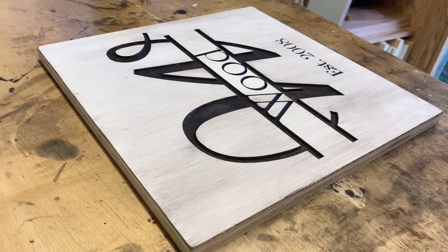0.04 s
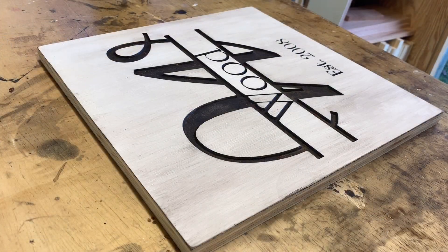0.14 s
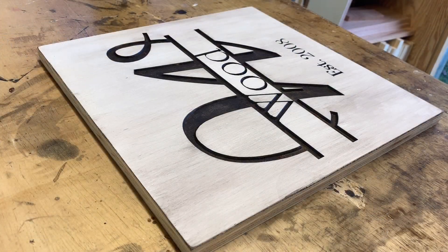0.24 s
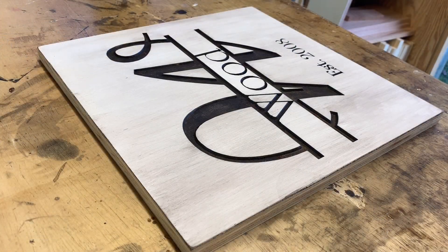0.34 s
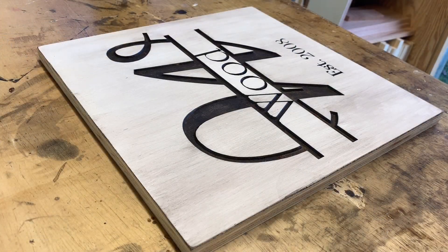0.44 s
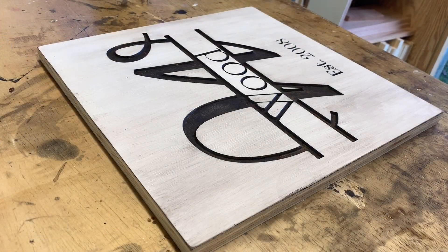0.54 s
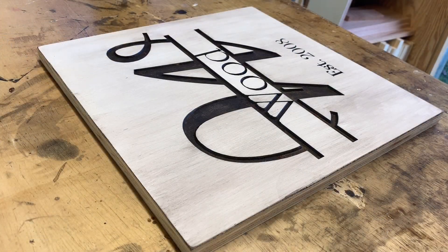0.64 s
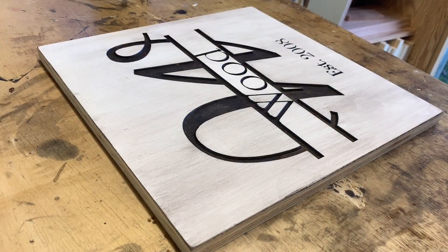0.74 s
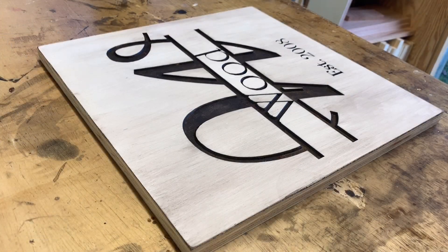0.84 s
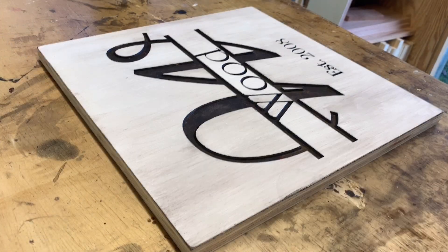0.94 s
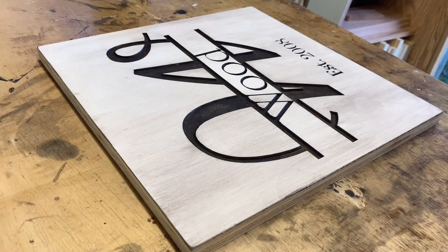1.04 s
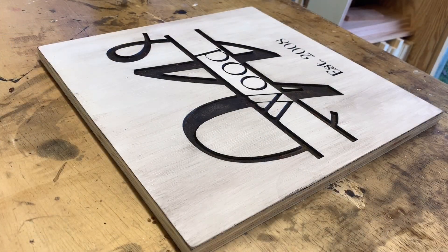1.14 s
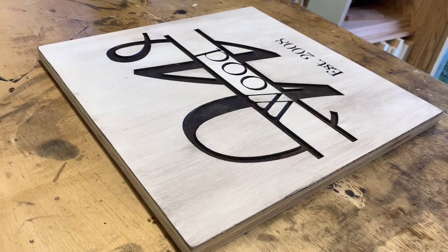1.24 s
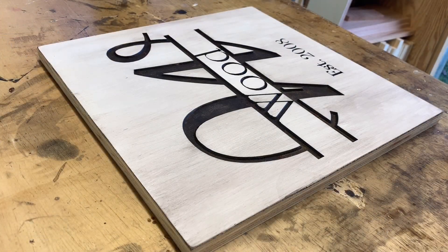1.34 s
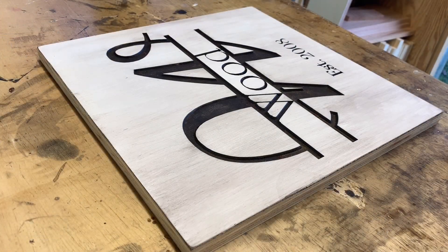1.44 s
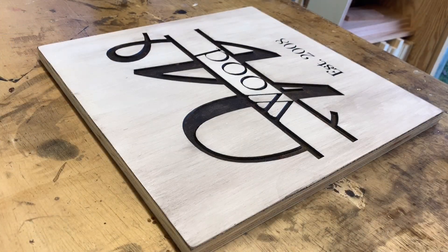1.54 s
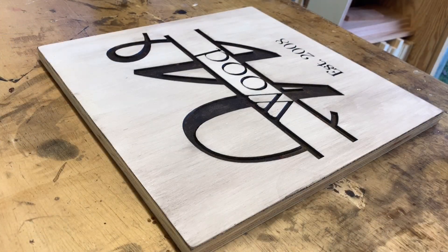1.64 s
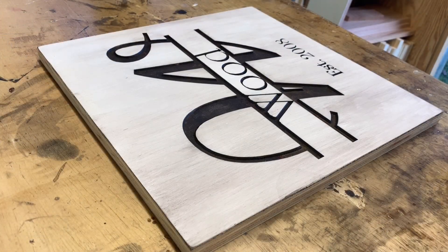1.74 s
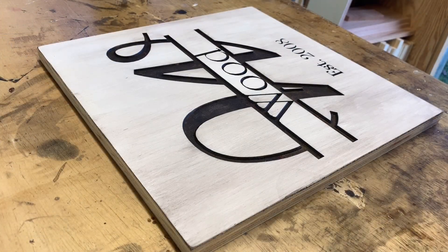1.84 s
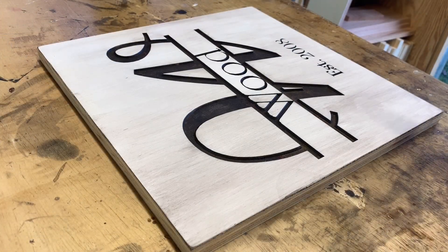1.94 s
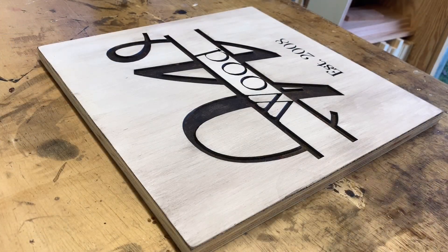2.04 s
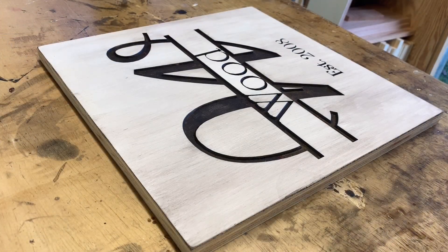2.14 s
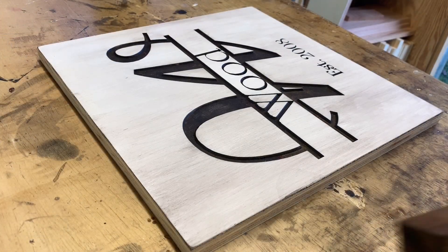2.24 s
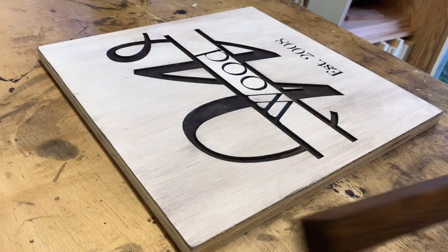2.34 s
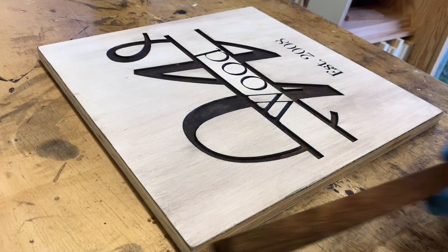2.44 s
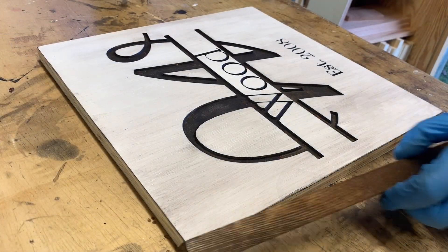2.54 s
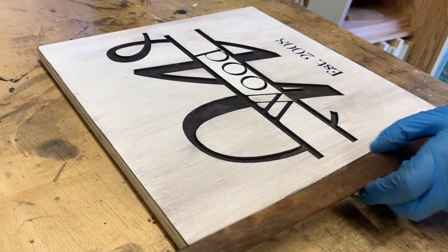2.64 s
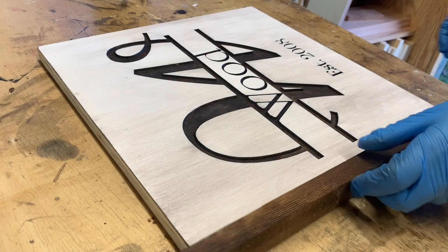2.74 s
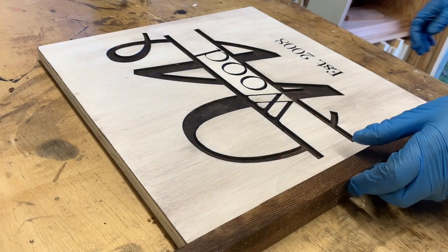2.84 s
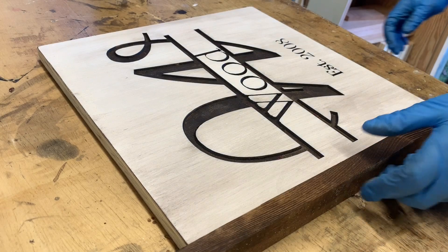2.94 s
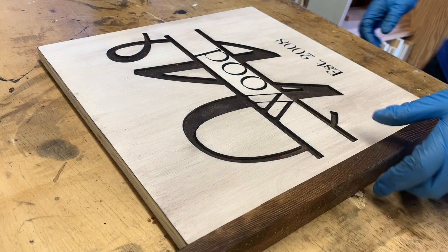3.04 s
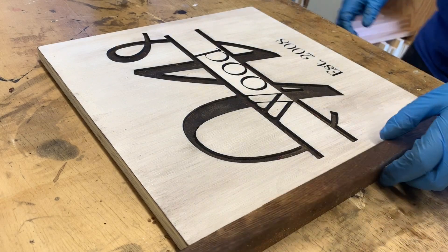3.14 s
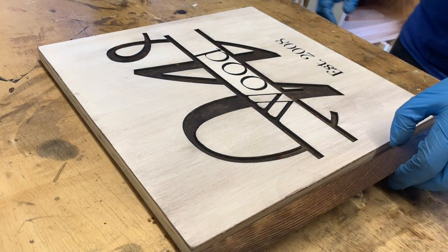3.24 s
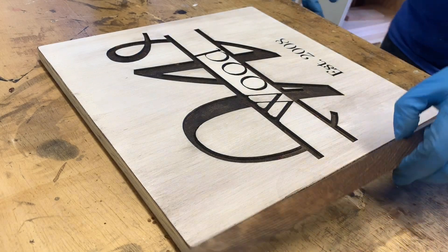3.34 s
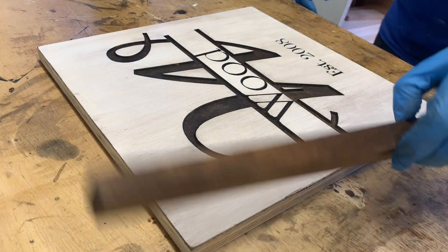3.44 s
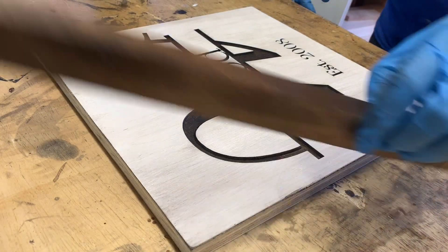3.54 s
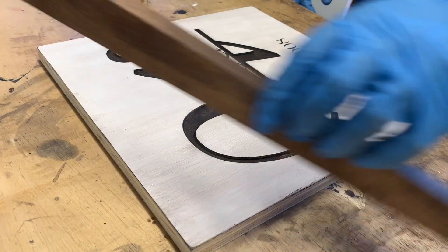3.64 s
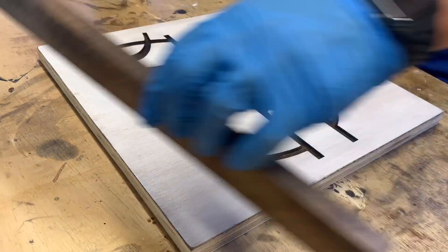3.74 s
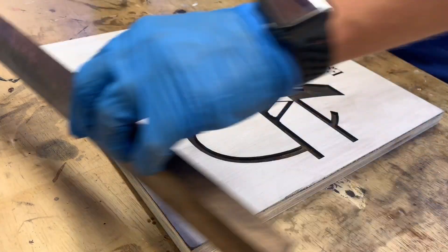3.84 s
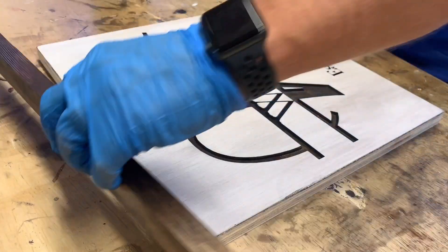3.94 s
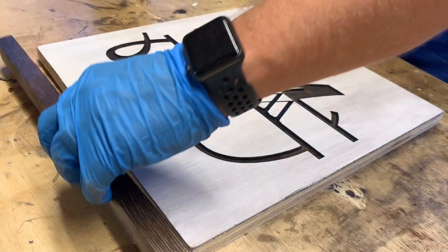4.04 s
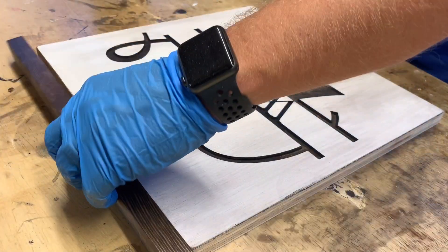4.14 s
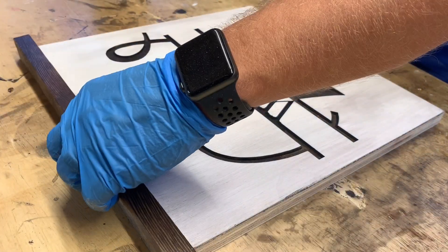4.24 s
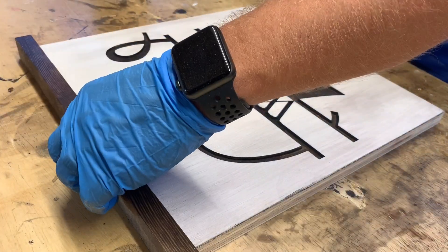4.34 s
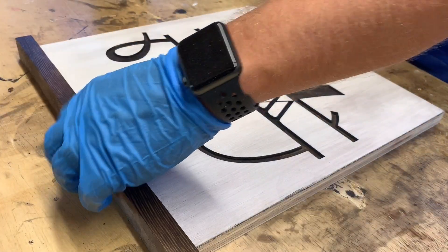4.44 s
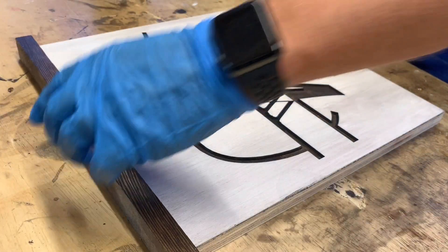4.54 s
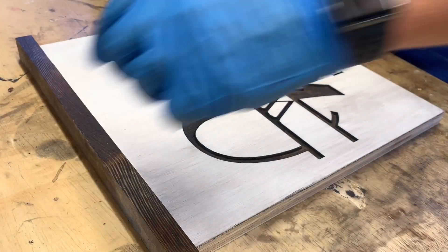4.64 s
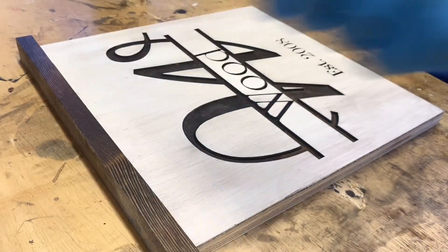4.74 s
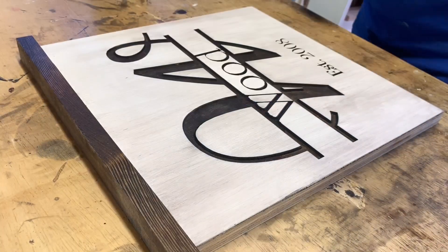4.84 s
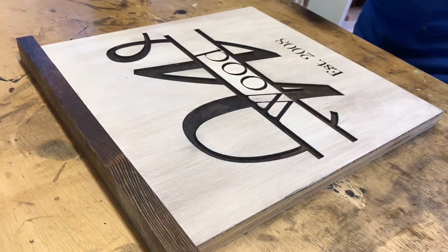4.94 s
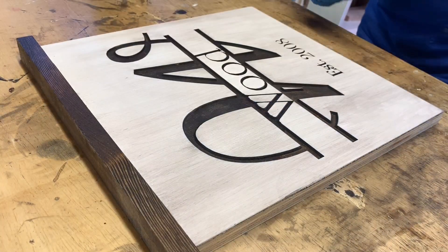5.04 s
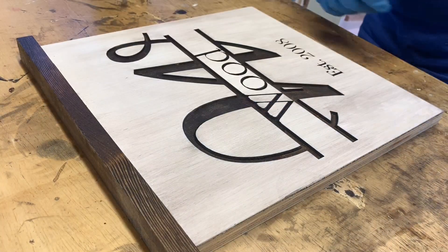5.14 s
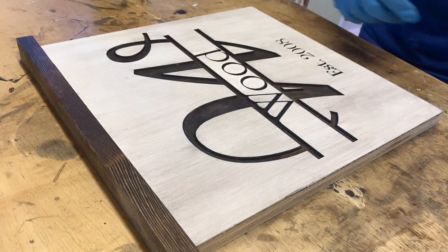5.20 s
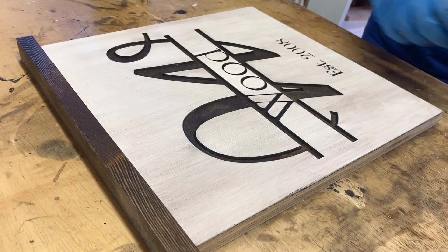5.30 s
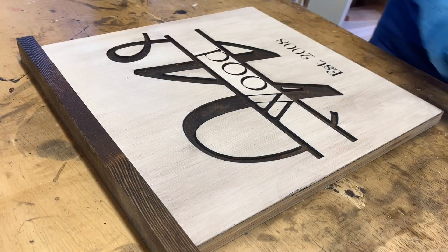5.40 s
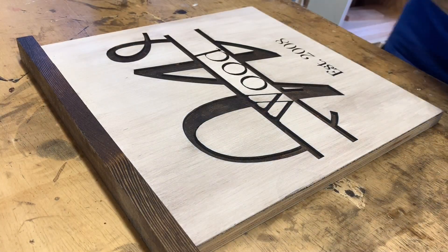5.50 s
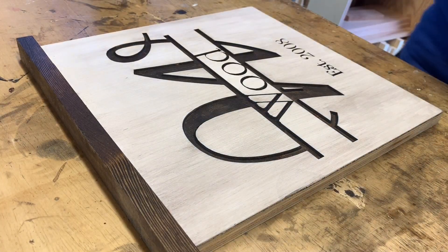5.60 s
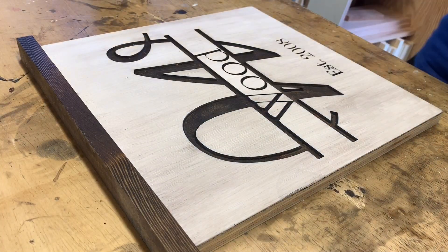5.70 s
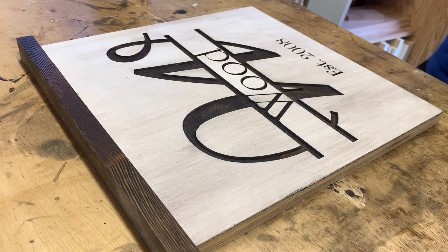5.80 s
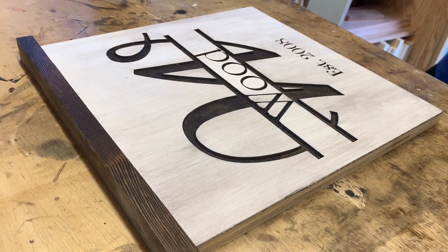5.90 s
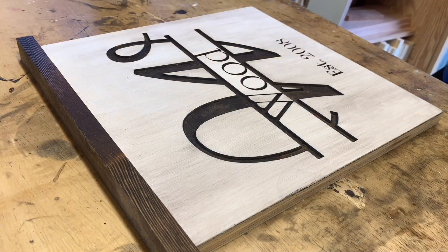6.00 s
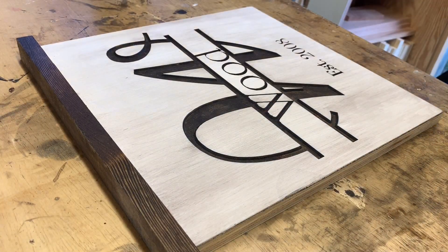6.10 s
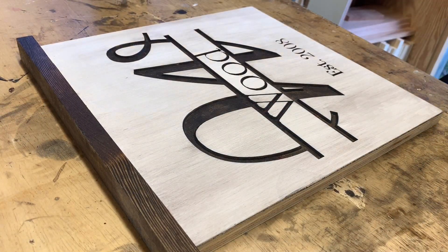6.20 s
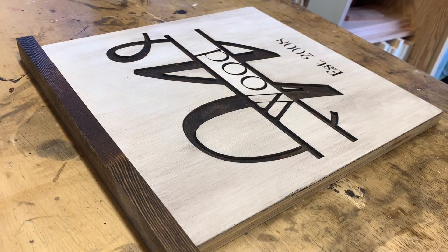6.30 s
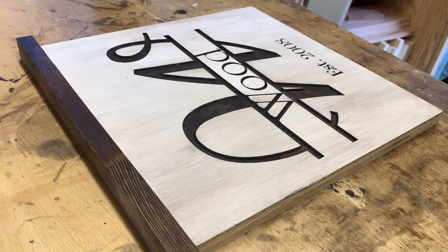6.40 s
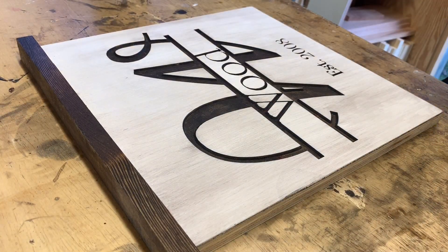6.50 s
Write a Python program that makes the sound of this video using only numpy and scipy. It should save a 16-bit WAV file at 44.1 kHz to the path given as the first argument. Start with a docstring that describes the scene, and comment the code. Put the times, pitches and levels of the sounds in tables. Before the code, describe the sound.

A hardwood strip thuds and clatters onto a panel edge, is moved and set down again, amid soft rubbing and quiet room air.

```python
"""In a small workshop, hardwood strips are tried against the edges of a plywood panel lying on a bench.
Each contact drives three layers: damped bench modes thud, dense filtered noise clacks as plywood, and
a few bending modes ring the strip; a decaying noise tail gives the workshop's brief answer.
Gloves and wood rub in between, as shaped noise with grains, and soft bumps swell in the bench.
Beneath lie room air, a faint motor whine, a whirr that comes and goes and a steady high hiss."""
import sys
import numpy as np
from scipy import signal
from scipy.fft import rfft, irfft, next_fast_len
from scipy.io import wavfile
from scipy.ndimage import uniform_filter1d, map_coordinates

SR = 44100
rng = np.random.default_rng(int(sys.argv[2]) if len(sys.argv) > 2 else 0)


def generate_wav(sig):
    """Save sig (samples, or channels by samples) to the path in sys.argv[1] as 16-bit PCM at SR."""
    pcm = np.round(np.clip(np.atleast_2d(sig).T, -1, 1) * 32767).astype(np.int16)
    wavfile.write(sys.argv[1], SR, pcm)


N = 289296
TIME = np.arange(N) / SR
HIT = np.arange(SR // 2) / SR  # time within one blow, s

# Blows of wood on wood: [t/s, thud level/dB, thud cut-off f/Hz, clack level/dB, clack cut-off f/Hz]
CONTACTS = [ (.052, -54, 393, -52.5, 2040), (1.132, -51, 600, -47.5, 2600), (1.561, -35.5, 300, -43, 2030),
            (1.568, -38, 503, -37.5, 2040), (1.7046, -33.5, 556, -40, 3700), (1.714, -44, 505, -44, 2960),
            (1.729, -41, 400, -45, 3000), (2.4993, -33.5, 432, -44.5, 2180), (2.586, -24, 424, -45, 2400),
            (2.590, -21.5, 200, -45, 2500), (2.742, -22, 600, -23, 3100), (2.774, -24.5, 300, -39, 8500),
            (2.784, -19, 545, -25.5, 2950), (2.798, -32, 694, -33, 1890), (2.811, -25, 434, -41, 1380),
            (2.828, -38, 590, -48, 1190), (4.1163, -33, 560, -48, 4000), (4.137, -31, 230, -49, 2400),
            (4.1675, -29.5, 800, -41, 900), (4.175, -39.5, 300, -53, 1000), (4.2227, -37.5, 694, -33, 2060),
            (4.234, -35.5, 700, -41, 2400), (5.415, -40, 330, -55.5, 2490), (5.428, -27, 213, -48.5, 2020),
            (5.439, -31.5, 198, -52, 2000), (5.775, -39, 394, -56, 1000), (6.2737, -72, 600, -42, 4240)]
# Strips set down or lifted, each with its grip and a brief drag: [t of the middle/s,
#  main flatwise mode f/Hz, ring over clack level/dB, edgewise over flatwise ring level/dB,
#  judder level/dB, scuff level/dB, crinkle level/dB]
PLACINGS = [ (1.149, 1406, -15, -21, -54, -56, -86), (1.581, 1460, -1.5, -31, -52, -53, -58),
            (1.723, 1606, -2.5, -5, -41, -50, -52), (2.515, 1615, 8.5, 11, -54, -60.5, -63),
            (2.623, 1630, 5.5, 2, -43.5, -50.5, -55), (2.79, 1632, 0, 1, -56, -45.5, -57),
            (4.152, 1654, -6.5, -14, -53, -58, -80), (4.253, 1630, 1, -19, -45, -53, -85),
            (5.44, 1740, -7, -6, -39.5, -56, -87), (5.818, 1540, -6, -19, -51.5, -57, -67),
            (6.299, 1573, 0.5, -13, -70, -51.5, -58.5)]
# While the strip meets the panel's left edge: [from t/s, to t/s]
LEFT_EDGE = (4, 4.5)
# Wood pushed along the bench: [t of the middle/s, half-length t/s, judder level/dB, scrape level/dB]
SLIDES = [(0.777, 0.033, -55, -56), (0.879, 0.044, -50, -54), (1.5, 0.03, -47, -50),
          (2.191, 0.024, -50.5, -66), (2.311, 0.053, -48, -62.5), (3.01, .042, -35.5, -40.5),
          (3.227, 0.059, -52, -55), (3.377, .04, -48.5, -56), (3.591, 0.044, -42.5, -55),
          (5.078, 0.024, -53, -57), (5.419, 0.017, -44, -53)]
# Gloves and sleeves on wood: [t of the middle/s, half-length t/s, rub level/dB, crinkle over rub level/dB]
RUBS = [(0.052, 0.03, -52.5, -1.5), (0.16, 0.037, -55.5, 1.5), (1.043, 0.037, -58, -6),
        (1.363, 0.11, -64, -5), (1.854, 0.057, -59, -22), (2.128, 0.086, -65, -2), (3.567, 0.037, -59, 1),
        (4.37, 0.053, -66.5, -8), (4.817, 0.14, -67.5, 0), (5.045, 0.049, -57.5, 2),
        (5.193, 0.065, -63.5, -2.5), (6.066, 0.082, -53, -2), (6.48, 0.062, -62.5, 1)]
# Soft bumps against the bench: [t/s, level/dB]
BUMPS = [(.01, -43.5), (.17, -53), (.27, -51), (.9, -43.5), (1.05, -43), (1.27, -52.5), (1.601, -39.5),
         (1.71, -50), (2.43, -46.5), (2.96, -58), (3.6, -46.5), (4.19, -40.5), (4.36, -51.5), (5.58, -55),
         (5.79, -60)]

# Modes of the bench with the panel on it: [f/Hz, relative level/dB, t60/s]
BENCH_MODES = [(83, -13.5, 0.27), (119, -15, 0.12), (167, -4.5, 0.21), (193.3, -2.5, 0.18),
               (268.8, 4.5, 0.1), (301.4, -1, 0.1), (390, 4, 0.068), (485, 5.5, 0.044), (521.6, -6.5, 0.2),
               (566, 2, 0.11), (730, -32, 0.2), (798, -9, 0.38)]
# Bending modes of a strip, retuned together to each placing's main mode (the second row):
#  [f before retuning/Hz, relative level/dB, t60/s, plane from -1 flatwise to 1 edgewise]
STRIP_MODES = [(875, -7, .11, .3), (1621, -2, .09, -1), (2186, 0, .068, 1), (2660, -19, .05, .5),
               (2920, -19, .04, -.6), (3740, -19, .05, .2), (4400, -27, .03, 0)]
# Colour of the dense plywood modes: [f/Hz, relative level/dB]
PLYWOOD_COLOUR = [(100, -26), (400, 2), (750, 12.5), (1020, 7), (1400, 10), (1900, 5), (2400, 1), (2900, 6),
                  (3350, -4), (4500, 6.5), (7000, -26), (16000, -44)]
# Colour of the shudder of everything on the bench: [f/Hz, relative level/dB]
SHUDDER_COLOUR = [(40, -24), (150, -12.5), (300, 24), (600, 6.5), (1200, -26.5), (4000, -61.0)]
# Decay of the workshop's answer: [f/Hz, t60/s]
ROOM_T60 = [(80, 0.099), (250, 0.26), (1000, 0.24), (3000, 0.22), (12000, 0.091)]

# Colour of soft bumps and tremor: [f/Hz, relative level/dB]
BUMP_COLOUR = [(20, -11), (40, -9), (58, 7), (78, 5), (105, -4.5), (140, -18), (250, -73)]
# Colour of the bench top's judder: [f/Hz, relative level/dB]
JUDDER_COLOUR = [(70, -10), (120, 0), (180, 6), (300, -2.5), (420, -14.5), (800, -40), (2000, -100)]
# Colour of rubbed wood: [f/Hz, relative level/dB]
RUSTLE_COLOUR = [(200, 10.5), (600, 4.5), (1500, 8), (2800, 5), (4500, 3.5), (7000, -5.5), (9000, -18),
                 (12000, -107), (16000, -50)]
# Colour of thin gloves crinkling, and of grit in hard contacts: [f/Hz, relative level/dB]
CRINKLE_COLOUR = [(3000, -10), (6000, -5), (9000, 2.5), (11500, -10.5), (13500, -4.5), (15800, -5.5)]
# Colour of the room air: [f/Hz, relative level/dB]
AIR_COLOUR = [(40, -19), (110, 8), (200, -1), (310, 4.5), (450, -7), (850, -2.5), (1050, -9), (1400, -15),
              (2000, -11.5), (2800, -15), (3300, -20.5), (5000, -34), (7000, -24.5), (16000, -74)]
# Colour of the narrow high hiss: [f/Hz, relative level/dB]
HISS_COLOUR = [(7000, -23.5), (8500, -20), (9100, -7.5), (9500, 3), (9800, 4.5), (10150, 1.5),
               (10500, -6.5), (11000, -111), (12000, -76), (13200, -39), (15800, -22)]
# Colour of the thin whirr: [f/Hz, relative level/dB]
WHIRR_COLOUR = [(900, -46), (1250, 17), (1350, 22.5), (1470, 25.5), (1580, 10.5), (2000, -57)]
# Course of the whirr, before its wobble: [t/s, level/dB]
WHIRR_LEVEL = [(0, -58), (.7, -70), (1.3, -63), (1.85, -59.5), (2.05, -67.5), (2.3, -61.5), (3.4, -64),
               (3.8, -69.5), (6.56, -72)]
# Tones of the motor whine: [f/Hz, relative level/dB]
WHINE_TONES = [(880, 0), (2600, -13), (2720, -23), (3010, -16)]
# Course of the whine, before its wobble: [t/s, level/dB]
WHINE_LEVEL = [(0, -68), (.75, -69), (1.35, -63.5), (2.1, -67.5), (3.3, -70.5), (4.5, -64.5), (5.2, -67.5),
               (6.1, -66), (6.56, -79)]
# Left-right likeness of diffuse noise: [f/Hz, correlation]
ALIKE = [(30, .75), (100, .92), (300, .78), (1000, .15), (2300, .5), (4200, -.05), (7000, .2), (9800, .75),
         (14000, .1)]

TOP_HZ = 15800  # upper band limit
BUMP_RISE_S, BUMP_T60_S = 0.019, 0.44  # swell and decay of a soft bump
TREMOR_DB, TREMOR_SWING_DB = -59, 5  # the low rumble that never quite stops
DRAG_S = 0.04  # half-length of the drag of a placing
MIC_LAG_S = .000218  # left behind right, for sources off to the right
HISS_DIFFUSE_DB, CRINKLE_DIFFUSE_DB = -16, -14.5  # share that arrives from all around
MICS = np.array([[-1], [1]]) / 2  # left and right microphone


def amp(db):
    """Decibels to gain."""
    return 10 ** (np.asarray(db) / 20)


def unit(x):
    """x at rms 1."""
    return x / np.sqrt(np.mean(x ** 2) + 1e-20)


def along(points, hz):
    """(f, value) points read on a log frequency axis."""
    f, value = np.transpose(points)
    return np.interp(np.log(hz + 1), np.log(f + 1), value)


def wobble(rate):
    """A smooth random curve, rate knots a second."""
    knots = rng.standard_normal(int(N * rate / SR) + 4)
    return map_coordinates(knots, [TIME * rate])


def filtered(x, response):
    """x times a complex response of frequency."""
    n = x.shape[-1]
    padded = next_fast_len(n + SR // 4)
    return irfft(rfft(x, padded) * response(np.fft.rfftfreq(padded, 1 / SR)), padded)[..., :n]


def pair(size):
    """White noise at the two microphones, as alike at each frequency as ALIKE says."""
    turn = lambda hz: np.arccos(np.clip(along(ALIKE, hz), -1, 1)) / 2
    mid_side = lambda hz: np.array([np.cos(turn(hz)), np.sin(turn(hz))])
    mid, side = filtered(rng.standard_normal((2, size)), mid_side)
    return np.array([mid + side, mid - side])


def noise(colour):
    """Stereo noise of rms 1 with a (f, dB) colour."""
    return unit(filtered(pair(N), lambda hz: amp(along(colour, hz))))


def from_right(x, diffuse_db):
    """A source off to the right reaches the left microphone later; some of it comes from all around."""
    direct = filtered(x[0], lambda hz: np.exp(2j * np.pi * hz * MICS * MIC_LAG_S))
    diffuse = np.roll(x, N // 2, axis=1)
    return unit(direct + amp(diffuse_db) * diffuse)


def room_air():
    """Steady broadband noise of the quiet room."""
    return amp(-61) * noise(AIR_COLOUR)


def high_hiss():
    """A narrow band of noise off to the right, its level wavering slightly."""
    return amp(-56.5 + 1.16 * wobble(4.676)) * from_right(noise(HISS_COLOUR), HISS_DIFFUSE_DB)


def whirr():
    """A thin band of noise that comes and goes."""
    level = np.interp(TIME, *np.transpose(WHIRR_LEVEL)) + 0.83 * wobble(9)
    return amp(level) * noise(WHIRR_COLOUR)


def motor_whine():
    """A few sine tones with slightly unsteady level and phase."""
    level = np.interp(TIME, *np.transpose(WHINE_LEVEL)) + wobble(9.1)
    out = 0
    for hz, db in WHINE_TONES:
        phase = 2 * np.pi * hz * TIME + .5 * wobble(2.4)
        out = out + amp(level + db) * np.sqrt(2) * np.sin(phase)
    return out


def workshop():
    """The steady bed: air, hiss, whirr and whine."""
    return room_air() + high_hiss() + whirr() + motor_whine()


def placed(x, side, pan_db):
    """The microphone nearer to the contact (side -1 left, 1 right) hears it louder and earlier."""
    mics = side * MICS
    lead = lambda hz: .00023 / (1 + (hz / 1800) ** 4)  # s, shrinking in the treble
    return amp(pan_db * mics) * filtered(x, lambda hz: np.exp(2j * np.pi * hz * mics * lead(hz)))


def stroke(s, half):
    """The speed of a hand movement rises and falls in a Gaussian curve."""
    return np.exp(-((TIME - s) / half) ** 2 / 2)


def bump(s):
    """A soft push swells up to time s, then dies away in the bench."""
    swell = stroke(s, BUMP_RISE_S) * (TIME < s)
    decay = amp(-60 * np.abs(TIME - s) / BUMP_T60_S) * (TIME >= s)
    return swell + decay


def handling():
    """Soft bumps pass through the bench, over a faint low tremor."""
    pushes = sum(amp(db) * bump(s) for s, db in BUMPS)
    tremor = amp(TREMOR_DB + TREMOR_SWING_DB * wobble(3.7))
    return placed(np.hypot(pushes, tremor) * noise(BUMP_COLOUR), 1, pan_db=.6)


def coloured(x, colour):
    """Causal minimum-phase filter with a (f, dB) colour."""
    size = 2048
    log_gain = np.log(amp(along(colour, np.fft.rfftfreq(size, 1 / SR))))
    fold = np.r_[1, np.full(size // 2 - 1, 2), np.zeros(size // 2)]
    impulse = irfft(np.exp(rfft(irfft(log_gain) * fold)))  # folded cepstrum back to a response
    return signal.fftconvolve(x, impulse[None], axes=1)[:, :x.shape[-1]]


def patchy(x, depth_db):
    """The colour of a rub shifts as the contact patch moves: smooth random gains over time and pitch."""
    z = signal.stft(x, nperseg=256)[2]
    field = uniform_filter1d(rng.standard_normal(z.shape[1:]), size=4, axis=0)
    field = uniform_filter1d(field, size=8, axis=1)
    return unit(signal.istft(z * amp(depth_db * unit(field)), nperseg=256)[1][:, :N])


def friction(colour):
    """Rubbing of rms 1: countless tiny slips, some of them standing out as grain."""
    when = rng.random(N) < 1200 / SR  # about 1200 grains a second
    slips = when * amp(np.minimum(4 * rng.standard_exponential(N), 12))
    grains = unit(coloured(pair(N) * slips, colour))
    return patchy(grains + noise(colour), depth_db=2.4)


def crinkling():
    """The fine crinkle of thin gloves, at rms 1."""
    return from_right(friction(CRINKLE_COLOUR), CRINKLE_DIFFUSE_DB)


def gloves():
    """Gloves and sleeves brush the wood and crinkle."""
    rub = sum(amp(db) * stroke(s, half) for s, half, db, _ in RUBS)
    crinkle = sum(amp(db + fine_db) * stroke(s, half) for s, half, db, fine_db in RUBS)
    return rub * friction(RUSTLE_COLOUR) + crinkle * crinkling()


def burst(x):
    """x with the energy of 20 ms at rms 1."""
    return unit(x) * np.sqrt(.02 * SR / x.shape[-1])


def softened(x, cut_hz, order):
    """A softer contact lasts longer and excites less treble: a low-pass."""
    return signal.sosfilt(signal.butter(order, min(cut_hz, SR / 3), fs=SR, output="sos"), x)


def dispersed(x, lag):
    """Bending waves are slower in the bass: lag is their delay in s at 300 Hz."""
    return filtered(x, lambda hz: np.exp(-4j * np.pi * lag * np.sqrt(300 * hz)))


def ring(modes, scatter_db, spread):
    """Damped modes, met a little differently by each blow; the microphones differ more in the high ones."""
    out = np.zeros((2, len(HIT)))
    for hz, db, t60 in modes:
        phase = spread * rng.standard_normal() + min(hz / 1500, .4) * rng.standard_normal((2, 1))
        level = db + scatter_db * rng.standard_normal() - 60 * HIT / t60
        out += amp(level) * np.cos(2 * np.pi * hz * HIT + phase)
    return out


def thud(cut_hz):
    """The bench's low modes, with a short shudder of everything lying on it."""
    modes = burst(ring(BENCH_MODES, scatter_db=1.5, spread=0.88))
    shudder = burst(coloured(pair(len(HIT)) * amp(-60 * HIT / 0.083), SHUDDER_COLOUR))
    body = softened(modes + amp(-7) * shudder, cut_hz, order=3)
    return burst(dispersed(body, lag=0.0013))


def clack(cut_hz):
    """A sharp first wave, then the plywood's quickly dying dense modes; grit crunches on hard contacts."""
    dense = burst(pair(len(HIT)) * amp(-60 * HIT / .05) * (1 - np.exp(-HIT / .002)))
    strike = burst(np.ones((2, 1)) * (HIT == 0))
    wood = softened(coloured(strike + amp(-1) * dense, PLYWOOD_COLOUR), cut_hz, order=6)
    grit = burst(coloured(pair(len(HIT)) * amp(-60 * HIT / 0.012), CRINKLE_COLOUR))
    hardness = min(cut_hz / 4500, 1) ** 2
    return dispersed(burst(wood), lag=.0014) + amp(-17) * hardness * grit


def strip(edge_db, main_hz):
    """The direction of the blow shares the ring between flatwise and edgewise bending."""
    retune = main_hz / STRIP_MODES[1][0]
    modes = [(hz * retune, db + plane * edge_db / 2, t60) for hz, db, t60, plane in STRIP_MODES]
    onset = 1 - np.exp(-HIT / .0004)
    return burst(ring(modes, scatter_db=.5, spread=.25) * onset)


def room(x):
    """The workshop's answer: a noise tail in which each frequency dies at its own speed."""
    hz, t, z = signal.stft(pair(SR // 2), SR, nperseg=256)
    decay = amp(-60 * t / along(ROOM_T60, hz)[:, None])
    tail = signal.istft(z * decay, SR, nperseg=256)[1][:, :len(HIT)]
    tail *= 1 - np.exp(-(HIT / 0.012) ** 2)  # the walls answer after the direct sound
    return signal.fftconvolve(x, tail / np.linalg.norm(tail[0]), axes=1)[:, :len(HIT)]


def knocks():
    """Every contact drives bench, plywood and strip at once; the nearest placing's grip sets the ring."""
    out = np.zeros((2, N + SR))
    for s, thud_db, thud_hz, clack_db, clack_hz in CONTACTS:
        main_hz, ring_db, edge_db = min(PLACINGS, key=lambda row: abs(row[0] - s))[1:4]
        side = -1 if LEFT_EDGE[0] < s < LEFT_EDGE[1] else 1
        low = amp(thud_db) * thud(thud_hz)
        panel = amp(clack_db) * clack(clack_hz)
        tone = amp(clack_db + ring_db) * strip(edge_db, main_hz)
        echo = room(amp(-16) * low + amp(-14) * panel + amp(-17) * tone)
        start = round(s * SR)
        out[:, start:start + len(HIT)] += placed(low + panel + tone, side, pan_db=2.2) + echo
    return out[:, :N]


def slides():
    """Wood sticks and slips along the bench: the top judders and the grain scrapes."""
    judder = sum(amp(db) * stroke(s, half) for s, half, db, _ in SLIDES)
    scrape = sum(amp(db) * stroke(s, half) for s, half, _, db in SLIDES)
    slips = unit(amp(0.26 * wobble(310)))  # fast, shallow level flutter
    grain = friction(RUSTLE_COLOUR) + amp(-10.5) * crinkling()
    return slips * placed(judder * noise(JUDDER_COLOUR) + scrape * grain, 1.0, pan_db=0.5)


def drags():
    """At each placing the strip drags a little: the bench judders, the grain scuffs, the glove crinkles."""
    judder, scuff, crinkle = sum(amp(row[4:])[:, None] * stroke(row[0], DRAG_S) for row in PLACINGS)
    bench = placed(judder * noise(JUDDER_COLOUR), 0.78, pan_db=2.5)
    return bench + scuff * friction(RUSTLE_COLOUR) + crinkle * crinkling()


def scene():
    """The work at the bench over the quiet workshop."""
    return workshop() + handling() + gloves() + knocks() + slides() + drags()


def record(dry):
    """Nothing above the band limit is kept."""
    return filtered(dry, lambda hz: hz < TOP_HZ)


dry = scene()
out = record(dry)
generate_wav(out)
```